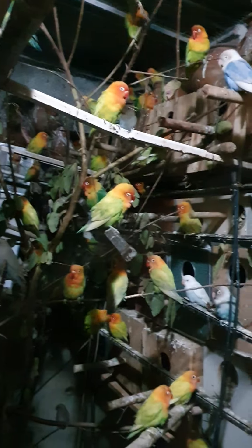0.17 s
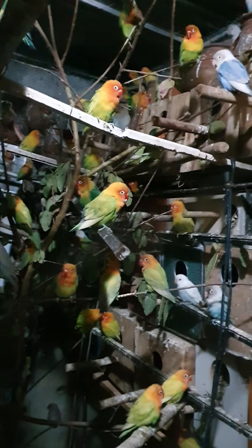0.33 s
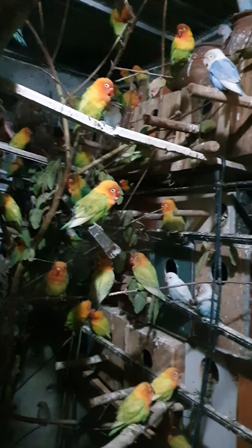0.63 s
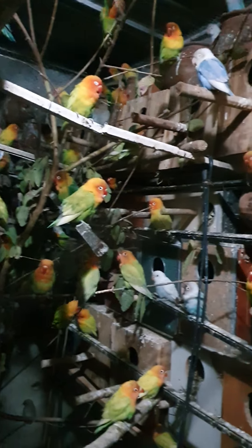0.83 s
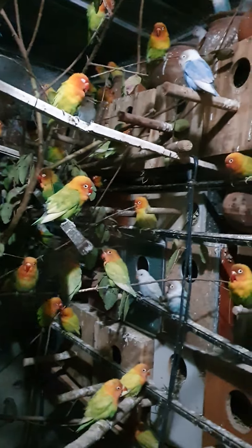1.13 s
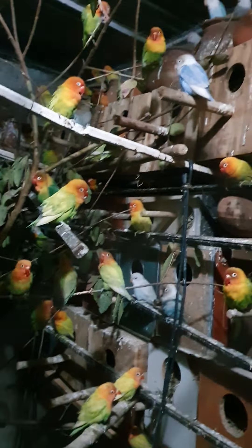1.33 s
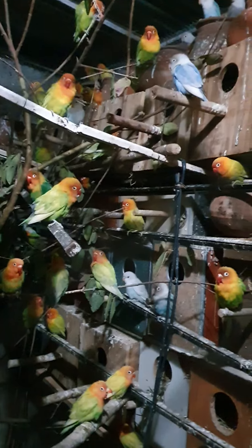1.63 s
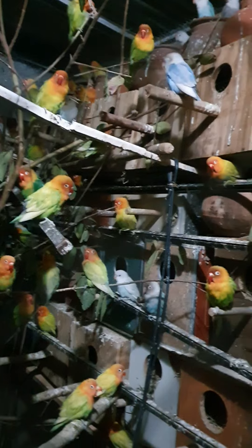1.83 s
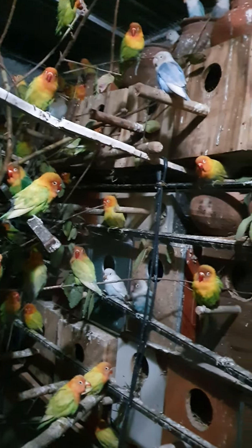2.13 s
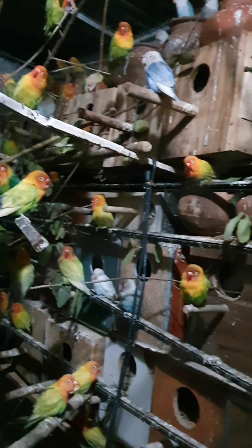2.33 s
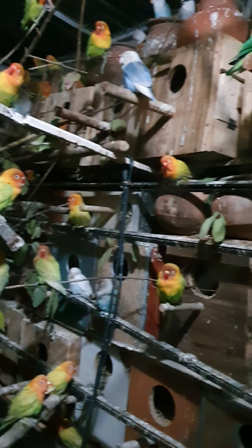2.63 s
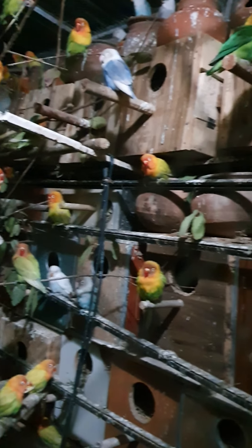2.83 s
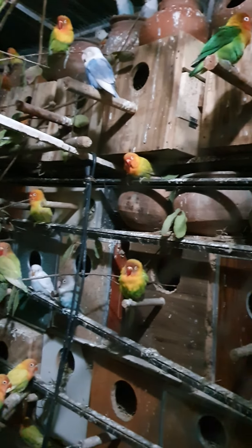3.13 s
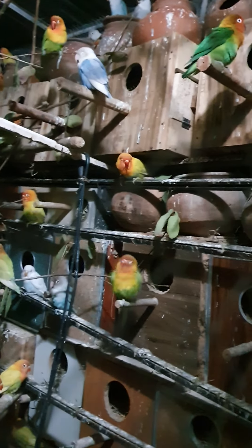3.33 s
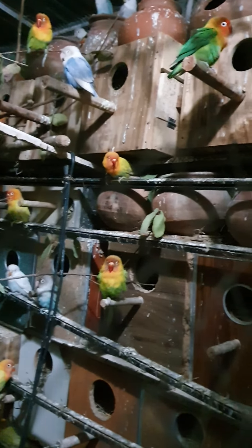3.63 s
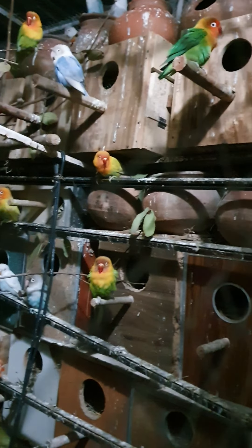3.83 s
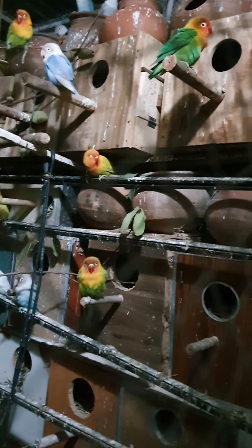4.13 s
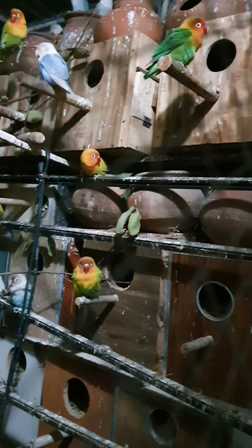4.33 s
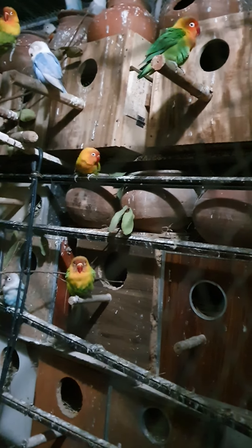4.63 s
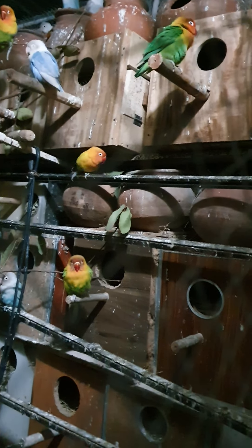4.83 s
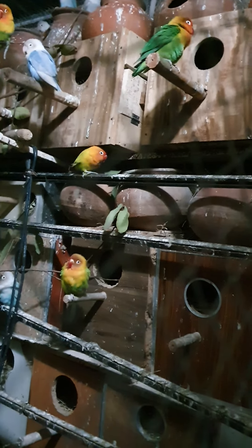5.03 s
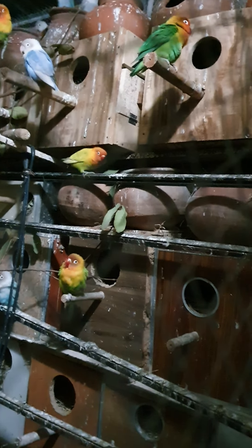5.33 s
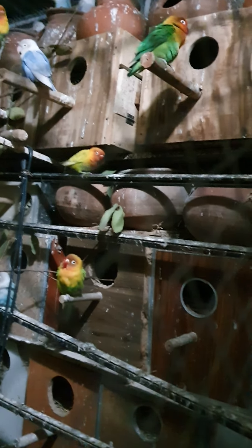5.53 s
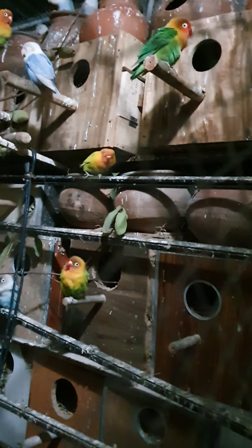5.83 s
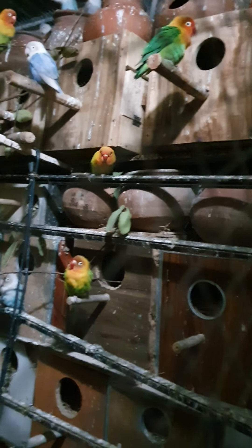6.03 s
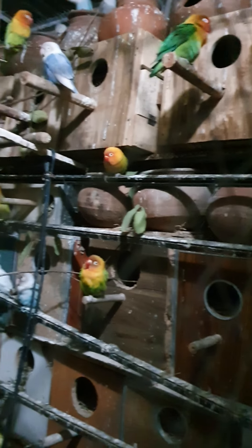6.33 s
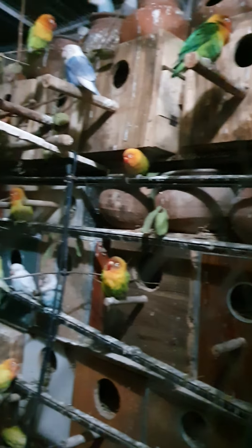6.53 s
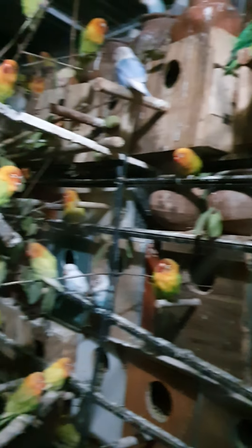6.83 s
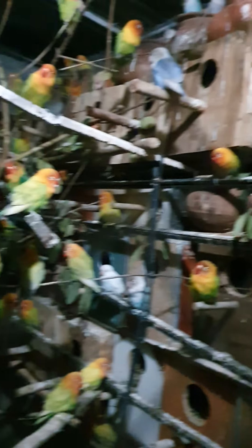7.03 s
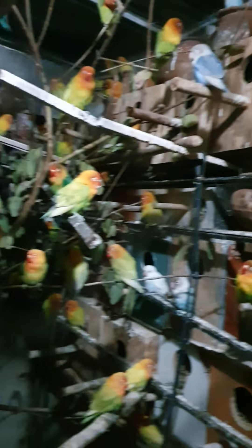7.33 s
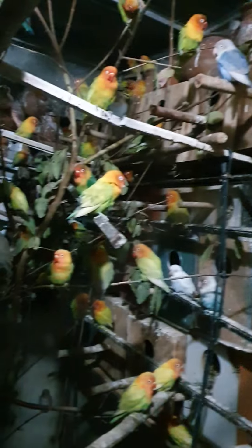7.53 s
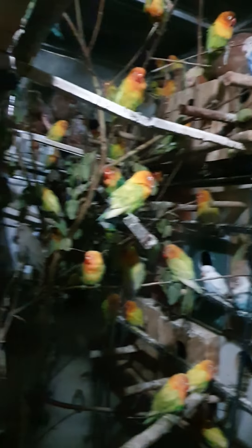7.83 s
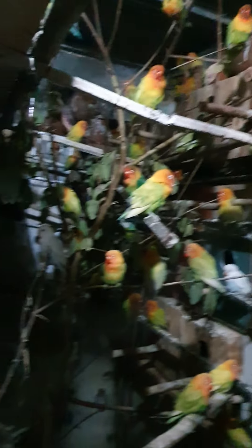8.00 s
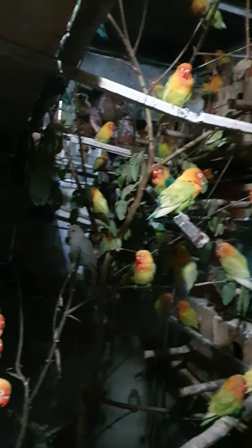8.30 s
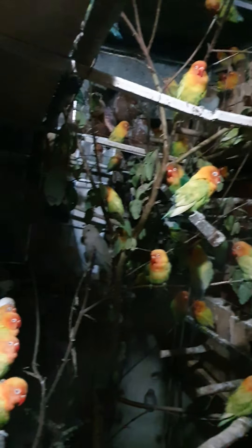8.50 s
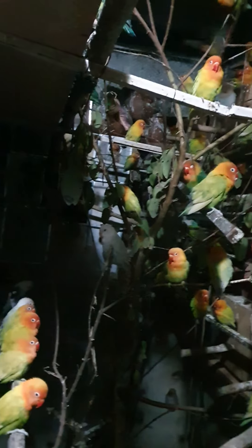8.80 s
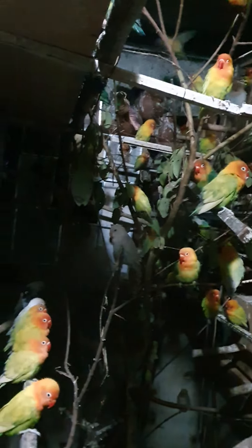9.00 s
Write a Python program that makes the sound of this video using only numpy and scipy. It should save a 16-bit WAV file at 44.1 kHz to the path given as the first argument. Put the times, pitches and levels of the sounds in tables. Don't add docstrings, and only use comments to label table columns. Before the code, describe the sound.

In an aviary of timber boxes and wire, small parrots make soft peeps, then one repeats fast, shrill, hoarse chirps for over a second. Sparse squeaks and short bursts follow, with a loud squawk past the middle. Wings puff and feet knock near the end. Far birds chatter faintly and traffic rumbles low; a hand-held phone picks it up in stereo.

```python
import sys
import numpy as np
from scipy import signal
from scipy.fft import rfft, irfft, next_fast_len
from scipy.io import wavfile
from scipy.ndimage import uniform_filter1d, map_coordinates

SR = 44100
rng = np.random.default_rng(int(sys.argv[2]) if len(sys.argv) > 2 else 0)


def file_out(sig):
    cols = np.atleast_2d(sig).T
    lim = np.clip(cols, -1, 1)
    pcm = np.round(lim * 32767).astype(np.int16)
    wavfile.write(sys.argv[1], SR, pcm)


def gain_from_decibels(decibels):
    exponent = np.asarray(decibels, float) / 20
    return 10 ** exponent


N = 403956


def unit(x):
    return x / np.sqrt(np.mean(x ** 2) + 1e-20)


def along(points, hz):
    point_hz, value = np.transpose(points)
    return np.interp(np.log(hz + 1), np.log(point_hz + 1), value)


def curves(rows):
    s, *columns = np.transpose(rows)
    return [np.interp(np.arange(N) / SR, s, column) for column in columns]


def wobble(rate):
    coarse = np.arange(0, N + 4, 4)
    knots = rng.standard_normal(int(N * 2000 / SR) + 4)
    smooth = map_coordinates(knots, [coarse * min(rate, 2000) / SR])
    return np.interp(np.arange(N), coarse, smooth)


def bouts(rows, rise_s, fall_s, still_db):
    t = np.arange(0, N, 32) / SR
    start, hold, db = np.transpose(rows)[..., None]
    before = (start - t) / np.reshape(rise_s, (-1, 1))
    after = (t - start - hold) / np.reshape(fall_s, (-1, 1))
    away = np.maximum(np.maximum(before, after), 0)
    power = (gain_from_decibels(db - 20 * away) ** 2).sum(0) + gain_from_decibels(still_db) ** 2
    return np.interp(np.arange(N) / SR, t, 10 * np.log10(power))


def rush(spectrum, alike, patchy_db, lean_db, size=(6, 10), lag=0):
    z = signal.stft(rng.standard_normal((2, N)), nperseg=512)[2]
    field = uniform_filter1d(rng.standard_normal(z.shape[1:]), size=size[0], axis=0)
    field = uniform_filter1d(field, size=size[1], axis=1)
    pair = signal.istft(z * gain_from_decibels(patchy_db * unit(field)), nperseg=512)[1][:, :N]
    m = next_fast_len(N)
    colour = gain_from_decibels(along(spectrum, np.fft.rfftfreq(m, 1 / SR)))
    mid, side = irfft(rfft(pair, m) * colour, m)[:, :N]
    turn = np.arccos(np.clip(alike, -1, 1)) / 2
    mid, side = np.cos(turn) * mid, np.sin(turn) * side
    ports = np.array([mid + side, np.roll(mid - side, lag)])
    return unit(ports * gain_from_decibels([[lean_db / 2], [-lean_db / 2]]))


def traffic():
    # time_s, rumble_db, left_minus_right_db
    swell = [
        (0.0, -45, -3),
        (4.57, -47.5, -1),
        (6.6, -44.5, -4),
        (7.2, -45, -8.5),
        (9.16, -45.5, -4),
    ]
    # pitch_hz, level_db (per Hz)
    rumble_colour = [(15, -64), (25, -27.5), (56, -6.5), (75, -1), (108, -13), (251, -23), (400, -32),
                     (520, -35.5), (880, -120)]
    rumble_db, lean_db = curves(swell)
    rumble = gain_from_decibels(rumble_db + 0.65 * wobble(9)) * rush(rumble_colour, 0.59, patchy_db=1.5, lean_db=1.5)
    return rumble * gain_from_decibels([lean_db / 2, -lean_db / 2])


def motors():
    # start_s, end_s, pitch_hz, level_db
    hums = [
        (0.83, 2.095, 303.6, -59),
        (4.995, 6.299, 245, -66),
    ]
    t, out = np.arange(N) / SR, np.zeros(N)
    for start, end, hz, db in hums:
        gate = np.clip(np.minimum(t - start, end - t) / 0.031, 0, 1)
        out += gain_from_decibels(db + 3.2 * wobble(6.6)) * gate * np.sin(2 * np.pi * hz * t)
    return out


def far_flock():
    # time_s, chatter_db
    swell = [(0.0, -74.5), (1.26, -60.5), (2.5, -63.5), (3.12, -75), (3.42, -54), (3.81, -66.5),
             (4.679, -65.5), (5.581, -56), (6.191, -67.5), (6.37, -55.5), (6.66, -63), (7.2, -56.5),
             (7.429, -50), (7.86, -56.5), (8.129, -55.5), (8.23, -48), (8.53, -59), (9.15, -53)]
    # pitch_hz, level_db (per Hz)
    chatter_colour = [(530, -40), (900, -6.5), (1140, -10.5), (1440, -2), (2010, -1), (3200, -32.5),
                      (4160, -57), (7040, -120)]
    chatter_db, = curves(swell)
    chatter = rush(chatter_colour, 0.028, patchy_db=4, lean_db=2.0, size=(2, 24))
    return gain_from_decibels(chatter_db + 2.0 * wobble(20)) * chatter


def wing_air():
    # peak_s, fade_s (time to fade by 20 dB), level_db
    beats = [(.3, 0.5, -62), (.72, 0.47, -57.5), (1.24, .5, -56), (1.9, 2.5, -62.5), (3.74, 2.5, -67),
             (5.1, 0.31, -55), (5.72, 0.1, -56.5), (6.04, 0, -54), (6.7, 1.1, -56), (6.98, 0.13, -35),
             (7.279, 0, -52), (7.44, 0.04, -42.5), (7.63, 0.27, -50.5), (7.741, 0.17, -40.5),
             (7.92, 0.1, -41), (8.05, 0.1, -44.5), (8.61, 1, -59.5), (8.81, 0.25, -48.5), ]
    # pitch_hz, level_db (per Hz)
    air_colour = [(120, -27.5), (200, 1), (295, -17.5), (450, -8.5), (649, -4), (1000, -14.5), (1560, -30),
                  (2640, -120)]
    fade_s = [fade for _, fade, _ in beats]
    wing_db = bouts([(s, 0, db) for s, _, db in beats], fade_s, fade_s, still_db=-72)
    far = rush(air_colour, 0.44, patchy_db=4, lean_db=4.0, size=(2, 18), lag=10)
    near = rush(air_colour, -0.98, patchy_db=3.5, lean_db=2.0, size=(2, 18), lag=-17)
    near_from_s = 6.5
    return gain_from_decibels(wing_db + 1.4 * wobble(25)) * np.where(np.arange(N) < near_from_s * SR, far, near)


def feather_rustle():
    # start_s, length_s, level_db
    rubs = [(.08, 0.32, -67), (.55, 0.24, -64.5), (.74, 0.28, -59), (1.06, 0.42, -56.5),
            (1.78, 0.096, -51.5), (2.05, 0.38, -67.5), (2.4, 0.16, -54.5), (2.6, 0.12, -65),
            (3.18, 0.137, -60.5), (3.34, 0.1, -66), (3.69, 0.03, -54.5), (4.07, 0.1, -56), (5, 0.28, -69.5),
            (5.49, 0.18, -50.5), (5.76, 0.049, -56), (5.865, .015, -58), (5.94, 0.03, -56),
            (6.23, 0.24, -53), (6.5, 0.51, -58.5), (7.09, 0.45, -58), (7.6, 0.44, -65.5), (8.05, 0.26, -62),
            (8.33, 0.086, -58.5), (8.62, 0.24, -67), (8.98, 0.093, -53)]
    # pitch_hz, level_db (per Hz)
    rustle_colour = [(1470, -15), (2500, -8), (3800, -7), (7530, -20), (8600, -18.5), (11500, -20),
                     (16000, -42.5)]
    rustle_db = bouts(rubs, rise_s=0.018, fall_s=0.086, still_db=-77)
    return gain_from_decibels(rustle_db + 3.6 * wobble(25)) * rush(rustle_colour, 0.037, patchy_db=3.0, lean_db=5.0)


def draughts():
    # time_s, length_s, level_db, port (0 left, 1 right)
    gusts = [
        (6.885, .03, -36, 0),
        (8.72, .06, -38, 1),
        (8.78, .06, -32, 1),
        (8.835, .05, -32, 1),
    ]
    out, t = np.zeros((2, N)), np.arange(N) / SR
    deep = [(30, -22.0), (90, -2), (200, -8.0), (400, -31), (900, -59.5)]  # (Hz, dB per Hz)
    air = rush(deep, 0, patchy_db=-0.5, lean_db=-2.0)
    for s, length, db, port in gusts:
        shape = np.exp(-((t - s) / length * 2.2) ** 2)
        out[int(port)] += gain_from_decibels(db) * shape * air[int(port)]
    return out


def claw_clicks():
    # time_s, peak_db
    clicks = [(3.142, -44), (3.34, -35), (4.174, -32), (4.639, -38.5), (6.356, -35), (7.502, -48),
              (6.739, -34), (6.884, -42), (7.208, -35), (2.391, -40.5), (2.612, -47), (2.688, -55),
              (3.318, -52), (5.822, -46)]
    out, t = np.zeros(N + SR), np.arange(300) / SR
    for s, db in clicks:
        click = gain_from_decibels(db + 3.0 - 60 * t / 0.0029) * rng.standard_normal(len(t))
        out[round(s * SR):][:len(t)] += click
    return signal.lfilter(*signal.butter(1, 3000 / (SR / 2)), out[:N])


def box_knocks():
    # time_s, peak_db
    steps = [
        (6.884, -38),
        (7.289, -44),
        (7.799, -42.5),
        (7.926, -39.5),
        (7.942, -45),
        (7.957, -35.5),
    ]
    # pitch_hz, level_db, t60_s (time to fade by 60 dB)
    walls = [(624, -6, 0.029), (898, 0.5, 0.013), (1220, 3, 0.013), (1570, -11, 0.015)]
    out, t = np.zeros(N + SR), np.arange(3000) / SR
    for s, db in steps:
        for hz, level, t60 in walls:
            fall = gain_from_decibels(level + rng.normal(0, 2.6) - 60 * t / t60)
            out[round(s * SR):][:len(t)] += gain_from_decibels(db - 4.5) * fall * np.sin(2 * np.pi * hz * t)
    return np.array([out[:N], -np.roll(out[:N], -17)])


def aviary(x):
    # pitch_hz, t60_s
    box_fade = [(1500, 0.16), (3500, 0.24), (5500, 0.13), (12000, 0.031)]
    out, step = np.zeros((2, N + SR)), SR // 4
    for at in range(0, N, step):
        hz, t, z = signal.stft(rng.standard_normal((2, step)), SR, nperseg=128)
        if np.abs(x[at:at + step]).max() < 1e-6:
            continue
        near_boxes = gain_from_decibels(-60 * t / along(box_fade, hz)[:, None])
        roof = 5.4 * gain_from_decibels(-60 * t / 0.069)
        tail = signal.istft(z * (near_boxes + roof), SR, nperseg=128)[1]
        wet = signal.fftconvolve(x[None, at:at + step], tail / np.linalg.norm(tail[0]), axes=1)
        out[:, at + 60:at + 60 + wet.shape[1]] += wet
    return out[:, :N]


def perch(voice):
    reach, count = 3.5 * SR / 1000, 7
    copies = np.zeros((2, round(reach) + 2))
    late = 1 + (rng.random((2, count)) * reach).astype(int)
    copies[[[0], [1]], late] = gain_from_decibels(-9.5) * rng.standard_normal((2, count))
    copies[:, 0] = 1
    return signal.fftconvolve(voice[None], copies / np.linalg.norm(copies, axis=1, keepdims=True), axes=1)


def birds(notes):
    # from_s, left_minus_right_db, right_lag_samples
    seats = [(0.72, 4.6, 6), (1.04, 0.9, 9), (1.26, 3.3, -15), (1.54, 3.2, 6), (2.06, 4.4, -4),
             (2.32, 1.9, -1), (3.17, 4.2, -16), (3.35, 2.6, 1), (3.68, 1.3, -10), (4.06, -2.6, 2),
             (4.34, 1.4, 0), (5, 2.2, 15), (5.78, 0.7, 9), (6.21, -2.2, -3), (6.26, -2.5, 16),
             (6.57, -2.1, 9), (6.68, -2.0, -1), (7.05, 1.2, 14), (7.23, 1.2, 2), (8.04, 5.4, -16),
             (8.33, 3.1, -12), (8.95, 1.4, 11)]
    # pitch_hz, level_db (per Hz)
    breath_colour = [(1500, -41.5), (3000, -13), (4500, 2), (7500, -17.5), (10000, -4), (12500, -14),
                     (15500, -50)]
    out = np.zeros((2, N + SR))
    rough_db = 2.9 * wobble(450) + 0.95 * wobble(1300)
    waver = 0.017 * wobble(350)
    hiss = rush(breath_colour, 0.9, patchy_db=4.5, lean_db=4)[0]
    rasp = unit(wobble(1700))
    flutter_hz = 267.4 * (1 + .2 * wobble(60))
    flutter = 2 * np.pi * np.cumsum(flutter_hz) / SR
    seat_s, lean_db, lag = np.transpose(seats)
    for path, over_db, strain in notes:
        s, path_hz, path_db = np.transpose(path)
        at, ms = round(s[0] * SR), (s[-1] - s[0]) * 1000
        u = np.linspace(0, 1, round(ms * SR / 1000))
        t, span = s[0] + u * ms / 1000, slice(at, at + len(u))

        drops = path_hz[-1] < path_hz[0] and not 2300 < path_hz[0] < 5000
        bend = (-0.018 if drops else .4) * min(1, 10 / ms)
        scoop = 1 - strain * bend * np.exp(-u * ms / 1.3)
        hz = uniform_filter1d(np.interp(t, s, path_hz), size=90, mode="nearest")
        hz = hz * scoop * (1 + strain * waver[span])
        turn = 2 * np.pi * np.cumsum(hz) / SR

        top_khz = 12.6 if 3.6 < s[0] < 6.8 else 14.2
        tone = np.sin(turn)
        for k, lift_db in enumerate([3.5, -1.0, -0.5, -7.0, -4.5, -6.5], start=2):
            khz = k * hz / 1000
            too_high_db = 25 * np.clip(khz - top_khz, 0, 9)
            too_low_db = 5.2 * np.clip(4.6 - khz, 0, 2)
            tone = tone + gain_from_decibels(over_db + lift_db - too_high_db - too_low_db) * np.sin(k * turn)

        shake = 1.024 * gain_from_decibels(strain * rough_db[span]) + .2 * strain ** 4 * rasp[span]
        voice = shake * tone + strain ** 3 * gain_from_decibels(-15) * hiss[span]
        attack = np.minimum(u * ms * strain ** 3 / 1.2, 1)
        fade = (1 - u ** 3) ** (0.34 * min(1, 32 / ms))
        release = np.minimum((1 - u) * ms / 2.5, 1)
        pulses = 1 - np.clip(.45 * strain ** 3, 0, .9) * np.cos(flutter[span] - flutter[at])
        voice = voice * gain_from_decibels(np.interp(t, s, path_db)) * attack * fade * release * pulses

        left, right = perch(voice)
        seat = max(np.searchsorted(seat_s, s[0]) - 1, 0)
        out[0, at:][:len(left)] += gain_from_decibels(lean_db[seat] / 2) * left
        out[1, at + int(lag[seat]):][:len(left)] += gain_from_decibels(-lean_db[seat] / 2) * right
    return out[:, :N]


def slides(rows, over_db, strain):
    return [([(s, start_hz, db), (s + ms / 1000, end_hz, db)], over_db, strain)
            for s, ms, start_hz, end_hz, db in rows]


def kind(rows, glide, over_db, strain):
    return slides([(s, ms, hz, hz * glide, db) for s, ms, hz, db in rows], over_db, strain)


def distant_calls():
    # start_s, length_ms, start_hz, end_hz, level_db
    faint = [(.84, 22, 4000, 4000, -61), (3.19, 25, 2400, 2440, -59), (5.7, 46, 3500, 3500, -58),
             (7.52, 20, 4900, 4700, -57), (.85, 15, 2570, 2570, -43.5), (.874, 13, 2850, 2620, -45),
             (3.48, 60, 3520, 3530, -70), (5.595, 16, 4240, 4340, -40), (7.12, 37, 3200, 3460, -58),
             (7.13, 17, 4600, 5200, -54), (7.225, 25, 5850, 5900, -55.5), (7.23, 160, 1493, 1480, -56),
             (7.26, 50, 4560, 4860, -65), (7.38, 40, 5920, 5600, -62), (8.372, 29, 3140, 4600, -51),
             (8.416, 22, 3960, 5200, -53), (8.72, 33, 4300, 4300, -64), (8.76, 19, 3700, 3650, -62.5),
             (8.98, 31, 2880, 3340, -57), (9.02, 27, 4900, 5000, -49), (9.04, 13, 3700, 3700, -52),
             (9.105, 35, 3720, 3500, -54), (9.135, 15, 2150, 2250, -52)]
    clear = [(2.453, 36, 4620, 4320, -31.5), (5.528, 42, 3010, 2970, -47), (6.601, 75, 1510, 1480, -67),
             (7.411, 140, 1850, 1810, -56.5), (7.621, 160, 1500, 1500, -70), (7.661, 111, 2400, 1950, -65),
             (5.749, 18, 4500, 4400, -55), (5.686, 18, 3560, 3400, -47), (7.151, 33, 3000, 3700, -50.5),
             (7.501, 25, 1660, 2200, -48), (6.431, 34, 4010, 4300, -54), (6.3, 32, 2790, 2780, -53),
             (3.366, 57, 3100, 3000, -55)]
    return slides(faint, over_db=-16, strain=.7) + slides(clear, over_db=-13.5, strain=0.72)


def short_calls():
    # start_s,
    # length_ms, start_hz, level_db
    yelps = [(1.7, 13, 2000, -44), (1.798, 15.5, 2110, -36), (2.163, 15, 2130, -39),
             (5.787, 18.4, 1995, -36.5), (5.864, 12.7, 1960, -31.5), (5.937, 13.7, 1972, -31)]
    peeps = [(0.96, 28, 4920, -43), (1.12, 28, 4100, -42), (3.205, 58, 3826, -47.5),
             (5.213, 15, 4630, -51.5), (3.412, 50, 3475, -49.5), (4.457, 33, 3580, -36.5),
             (4.472, 25, 4820, -41), (5.482, 32.5, 4500, -46), (5.648, 46, 3500, -40.5),
             (6.372, 15, 3400, -31.5), (6.397, 39, 3780, -39.5), (6.481, 37, 4427, -38),
             (7.131, 18.6, 5680, -41), (7.18, 33, 3650, -48.5), (7.216, 20, 3700, -45),
             (9.012, 28, 4330, -39.5), (9.086, 27, 3770, -45)]
    squeaks = [(1.051, 22, 3304, -37.5), (1.067, 34.4, 4610, -36), (1.082, 40, 2960, -45.5),
               (3.71, 8.2, 5510, -40), (8.051, 18.2, 4510, -38.5), (8.361, 23, 3040, -44)]
    chips = [(0.948, 41, 2825, -43.5), (3.709, 10.4, 2924, -39.5), (6.218, 13, 3550, -40.5),
             (6.259, 22, 4646, -28), (8.074, 11, 4470, -37.5), (8.136, 11.3, 4480, -42.5),
             (8.159, 13, 4610, -39.5)]
    # start_s, length_ms, start_hz, end_hz, level_db
    wide = [(1.5, 10, 3770, 3930, -38.5), (2.1, 14, 5115, 3054, -42.5), (3.696, 24, 4040, 4120, -47),
            (6.222, 18, 5500, 5670, -26), (6.232, 39, 6556, 6350, -26), (3.688, 17.9, 2510, 2820, -52.5),
            (8.402, 16, 4170, 4000, -50)]
    warbles = [(.753, 13, 4170, 4300, -49), (.898, 19, 4430, 4620, -49), (.928, 42, 2625, 2790, -44.5),
               (4.068, 30, 2260, 2580, -49.5), (4.092, 28, 2910, 3210, -41.5), (4.093, 10, 3330, 3420, -38),
               (4.069, 10, 4280, 5200, -41), (4.082, 14.2, 4680, 4560, -40), (4.453, 34, 2690, 2860, -47.5),
               (6.405, 39, 5630, 5940, -51), (8.334, 28, 2583, 2460, -51)]
    notes = kind(yelps, glide=.8, over_db=-9.5, strain=0.88)
    notes += kind(peeps, glide=1.0, over_db=-22.5, strain=0.88)
    notes += kind(squeaks, glide=1.08, over_db=-9.0, strain=1.11)
    notes += kind(chips, glide=1.0, over_db=-9.0, strain=0.93)
    notes += slides(wide, over_db=-11.5, strain=1.08)
    return notes + slides(warbles, over_db=-13.5, strain=0.89)


def winding_calls():
    # time_s, pitch_hz, level_db
    slurs = [
        [(.729, 2480, -38), (.748, 5800, -53), (.764, 2640, -37), (.786, 2480, -38), (.795, 5030, -38),
         (.808, 4400, -50)],
        [(.812, 3870, -46), (.822, 4040, -37.5), (.833, 4120, -46)],
        [(.828, 3300, -40), (.835, 2500, -35.5), (.843, 2200, -44)],
        [(4.103, 3600, -18), (4.113, 5770, -42), (4.134, 5880, -44), (4.14, 3960, -39), (4.152, 2510, -44),
         (4.174, 3520, -40), (4.183, 5400, -48), (4.196, 4920, -32.5), (4.218, 5440, -31.5)],
        [(7.3, 3880, -56), (7.348, 3420, -54), (7.366, 1990, -48), (7.388, 1438, -49), (7.46, 1400, -52)],
    ]
    squawk = [(6.262, 2847, -29), (6.274, 3071, -20.5), (6.28, 3584, -21), (6.286, 4240, -15.5),
              (6.31, 4520, -23), (6.335, 4610, -19.5), (6.35, 4590, -22)]
    arch = [(5.599, 2150, -41), (5.621, 2425, -40.5), (5.646, 2160, -43)]
    climbs = [
        [(4.349, 2700, -64), (4.357, 3600, -48), (4.363, 4280, -49), (4.373, 5000, -52)],
        [(4.36, 2990, -59), (4.372, 3800, -55.5), (4.386, 4120, -48)],
        [(6.578, 2980, -36.5), (6.586, 3990, -33.5), (6.597, 3676, -31)],
        [(6.692, 2696, -46), (6.706, 3424, -31.5), (6.715, 3700, -27.5)],
        [(6.806, 2703, -39.5), (6.816, 3284, -28), (6.82, 4080, -29.5), (6.828, 4300, -30)],
    ]
    holds = [
        [(3.351, 4290, -38.5), (3.358, 5810, -29), (3.372, 5610, -29), (3.388, 5350, -27.5)],
        [(4.575, 4260, -30), (4.585, 4004, -30.5), (4.594, 4690, -25.5), (4.606, 4130, -27)],
        [(6.594, 5060, -31), (6.606, 4520, -34), (6.623, 4530, -28)],
        [(6.714, 5100, -18), (6.724, 4570, -24.5), (6.739, 4460, -21)],
        [(6.825, 4840, -24), (6.836, 4840, -22), (6.851, 4970, -22)],
    ]
    notes = [(path, -19, .55) for path in slurs]
    notes += [(squawk, -18, .95), (arch, -7, .55)]
    notes += [(path, -9, 1.25) for path in climbs]
    return notes + [(path, -13, .8) for path in holds]


def shrill_run():
    # start_s, start_hz, level_db
    chirps = [(1.186, 4180, -23.5), (1.268, 5655, -23.5), (1.344, 5700, -21), (1.419, 3840, -26),
              (1.432, 5040, -24.5), (1.482, 4380, -24.5), (1.546, 5540, -16.5), (1.616, 5520, -15.5),
              (1.689, 5300, -15.5), (1.771, 4610, -23.5), (1.847, 4910, -20), (1.926, 4870, -19.5),
              (2.007, 4820, -18.5), (2.087, 4760, -18.5), (2.17, 4590, -18), (2.252, 4530, -15.5),
              (2.333, 4710, -16.5), (2.419, 4580, -19), (2.503, 4520, -18.5)]
    # start_s, length_ms, pitch_hz, level_db
    answers = [(1.165, 15, 3850, -40), (1.173, 13.6, 4600, -33), (1.19, 12, 5050, -29),
               (1.277, 12, 5300, -31.5), (1.357, 8.5, 5200, -28), (1.358, 8, 3700, -40.5),
               (1.481, 4, 6000, -33.5), (1.419, 4, 6560, -35.5), (1.707, 9.2, 3330, -39.5),
               (1.8, 8.3, 5900, -29.5), (1.998, 8.8, 3330, -36), (2.063, 6.3, 2500, -37.5),
               (2.092, 4.4, 3350, -34.5), (1.517, 12, 4840, -41), (2.219, 6.3, 2350, -52.5),
               (2.301, 3.9, 2300, -45), (2.39, 7.9, 2350, -43.5)]
    home_hz, pull = 4865, 0.53
    rows = []
    for s, hz, db in chirps:
        ms = 6.56 + 4.8 * max(s - 1.6, 0)
        rows.append((s, ms, hz, hz + pull * (home_hz - hz), db))
    return slides(rows, over_db=-9.5, strain=1.103) + kind(answers, glide=1.005, over_db=-10.5, strain=1.105)


def scene():
    background = traffic() + motors() + far_flock() + wing_air() + feather_rustle() + draughts()
    notes = distant_calls() + short_calls() + winding_calls() + shrill_run()
    flock = birds(notes) + claw_clicks() + box_knocks()
    echoes = gain_from_decibels(-7.5) * aviary(flock[0])
    return background + flock + echoes


def low_pass(x):
    return signal.sosfilt(signal.butter(12, 16670, fs=SR, output="sos"), x)


def record(dry):
    # pitch_hz, level_db
    port_colour = [(5600, 0), (7200, -2.5), (8800, 0.5), (13500, 0.5), (15500, -1.5)]
    dry = irfft(rfft(dry) * gain_from_decibels(along(port_colour, np.fft.rfftfreq(N, 1 / SR))), N)
    dry = dry / (1 + np.abs(dry / .56) ** 4) ** (1 / 4)
    dry = signal.sosfilt(signal.butter(10, 16100 / (SR / 2), output="sos"), dry)
    return low_pass(dry)


dry = scene()
out = record(dry)
file_out(out)
```